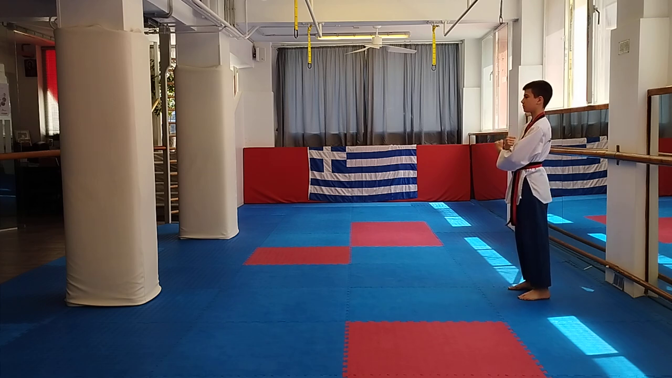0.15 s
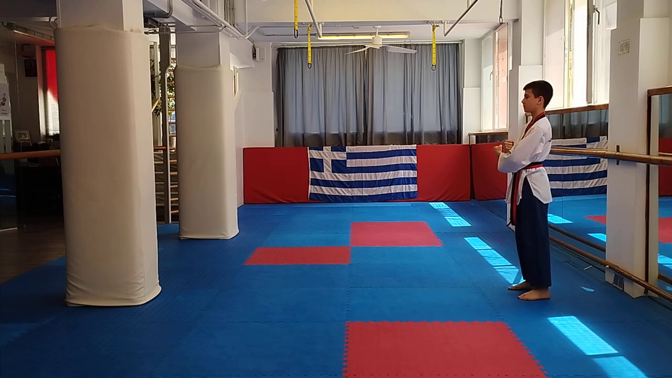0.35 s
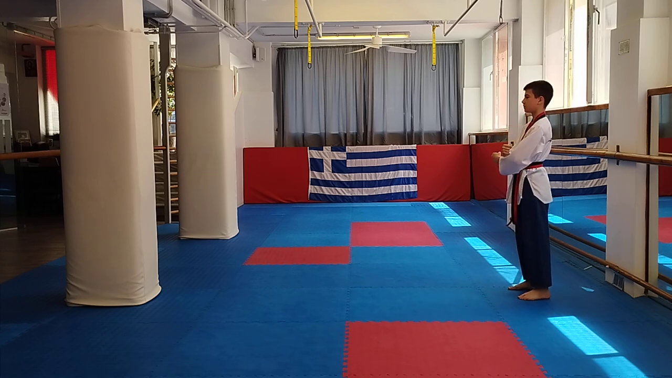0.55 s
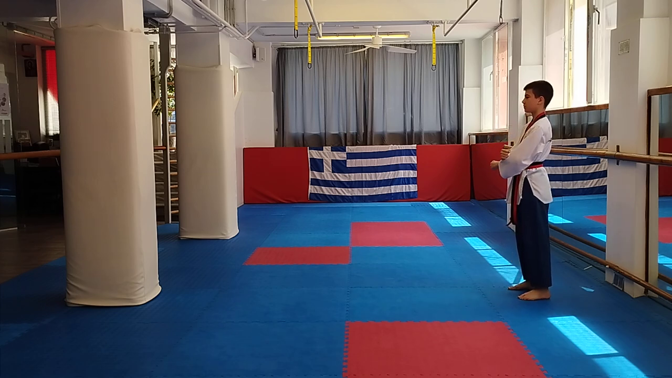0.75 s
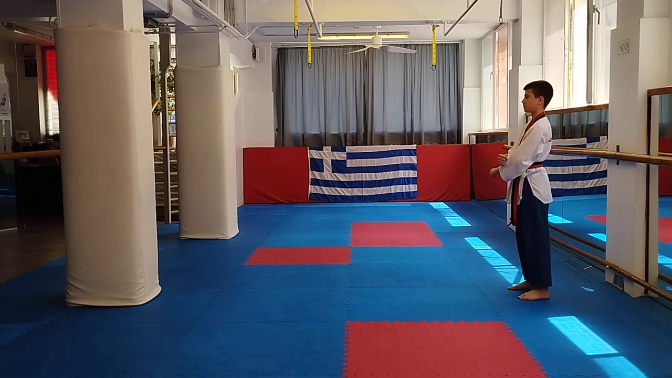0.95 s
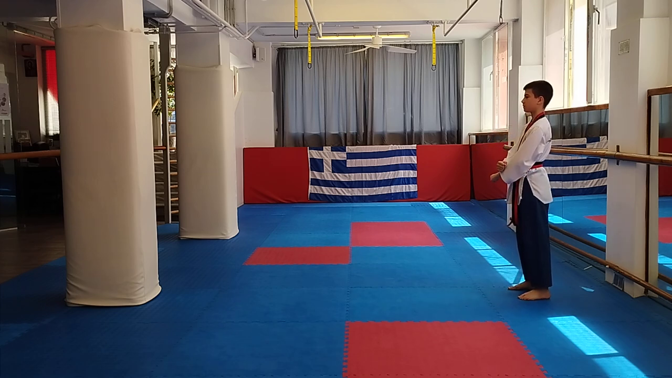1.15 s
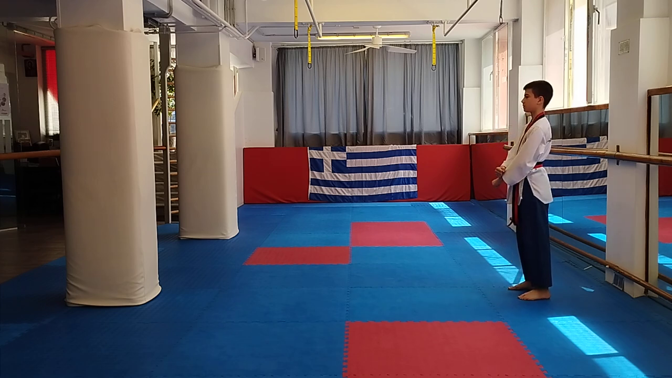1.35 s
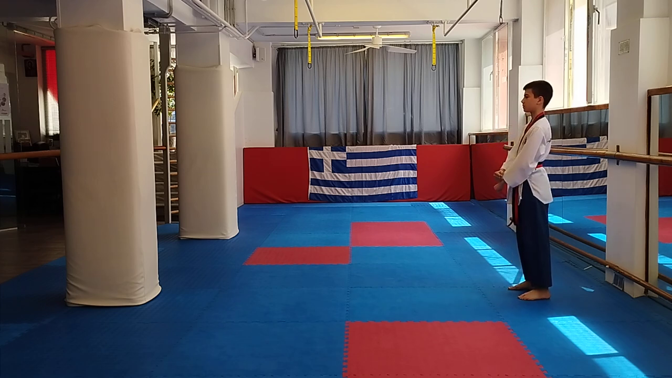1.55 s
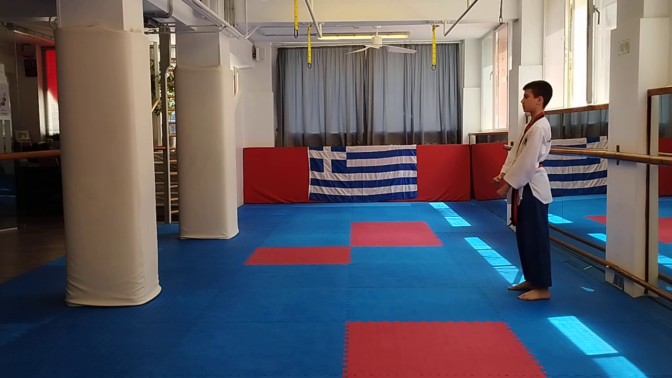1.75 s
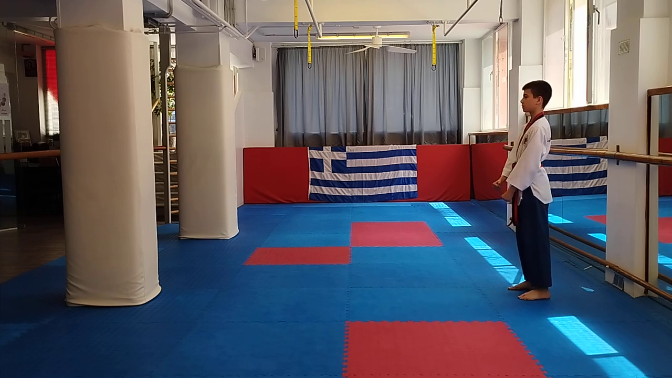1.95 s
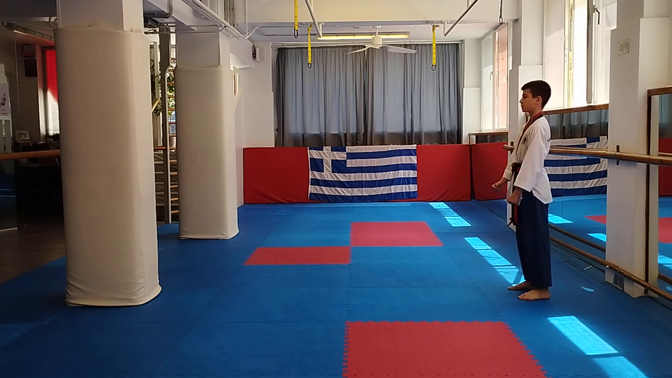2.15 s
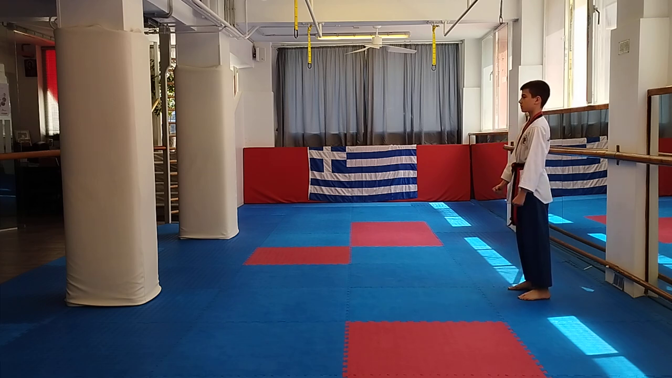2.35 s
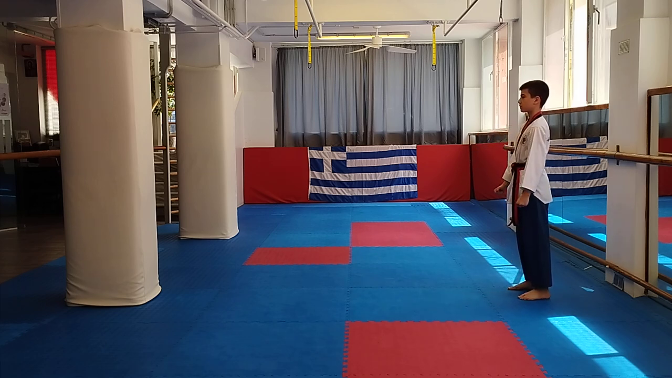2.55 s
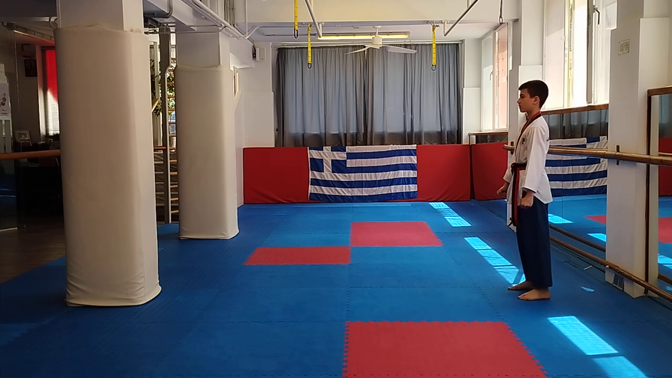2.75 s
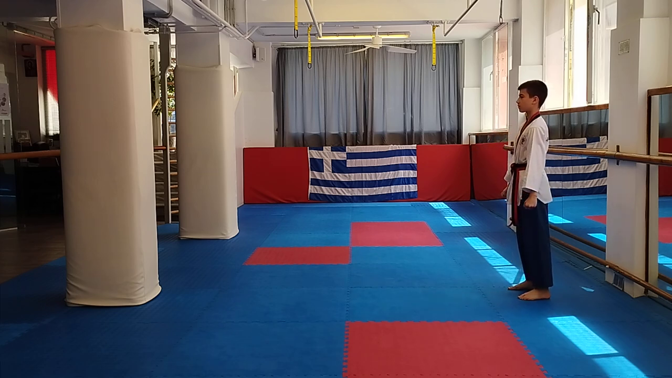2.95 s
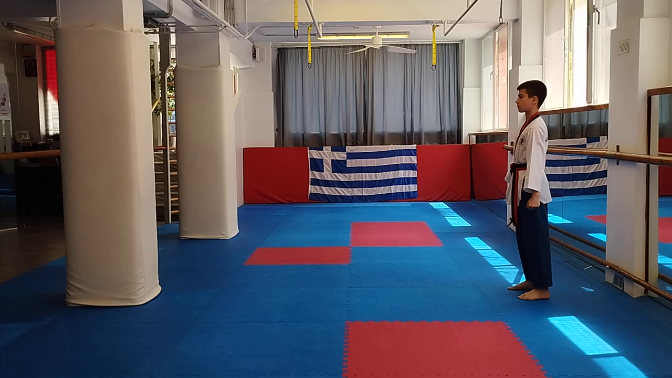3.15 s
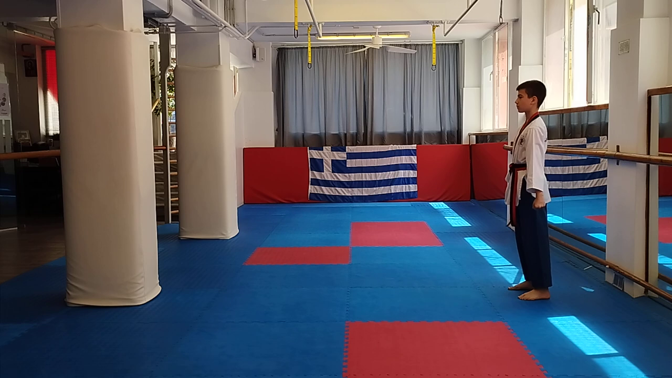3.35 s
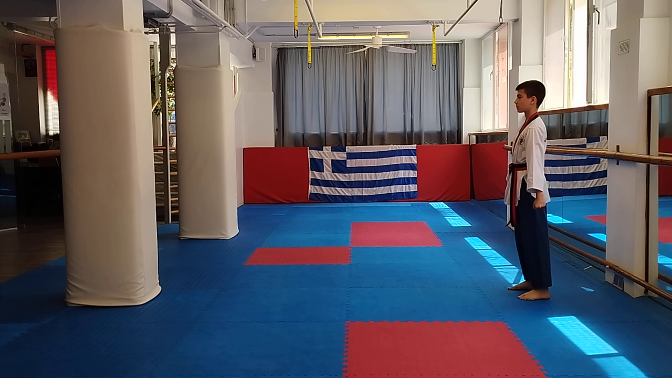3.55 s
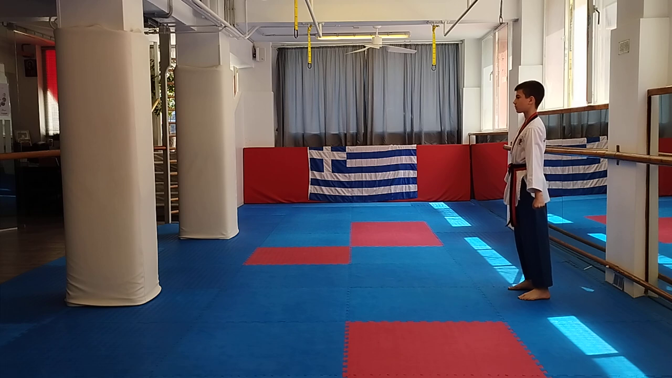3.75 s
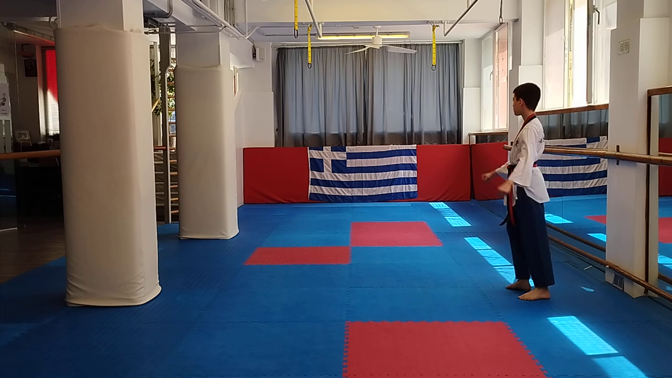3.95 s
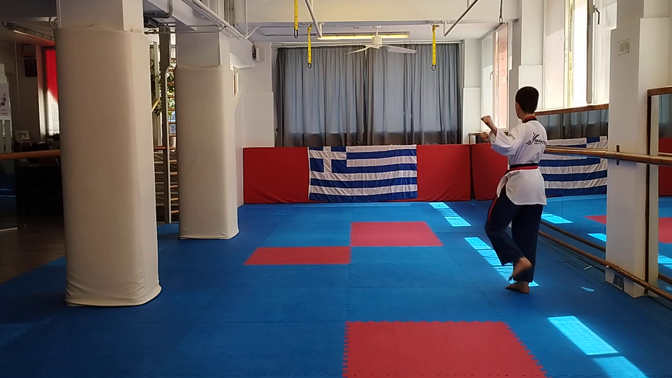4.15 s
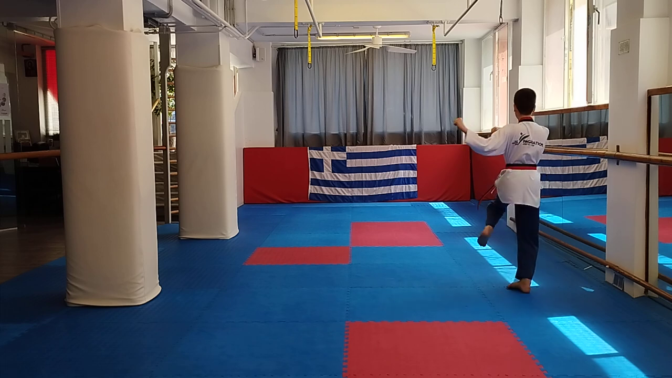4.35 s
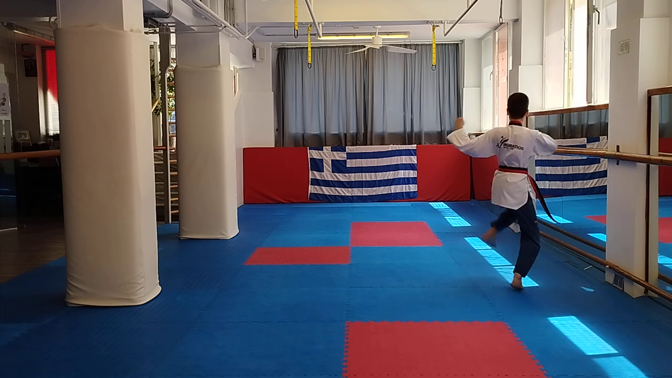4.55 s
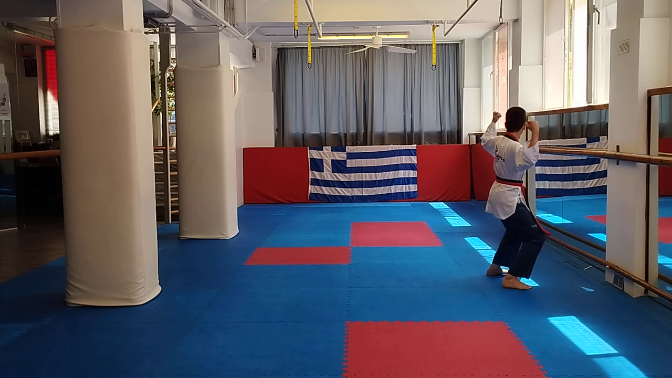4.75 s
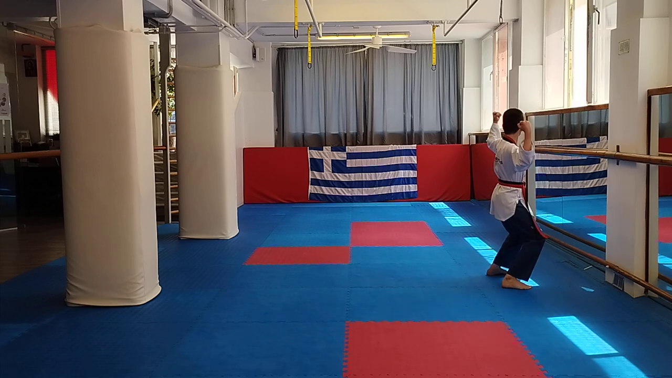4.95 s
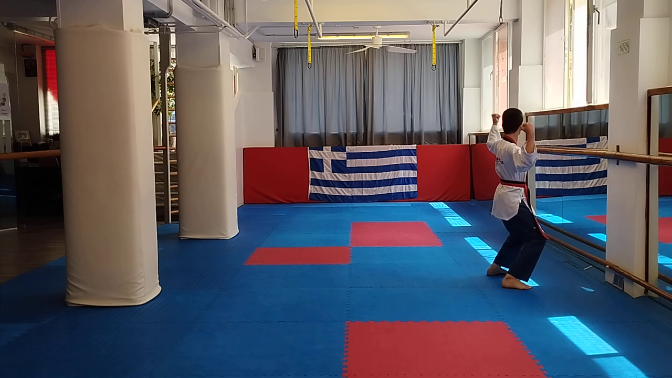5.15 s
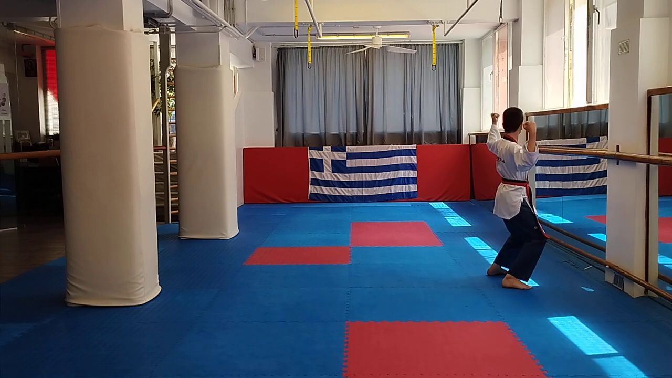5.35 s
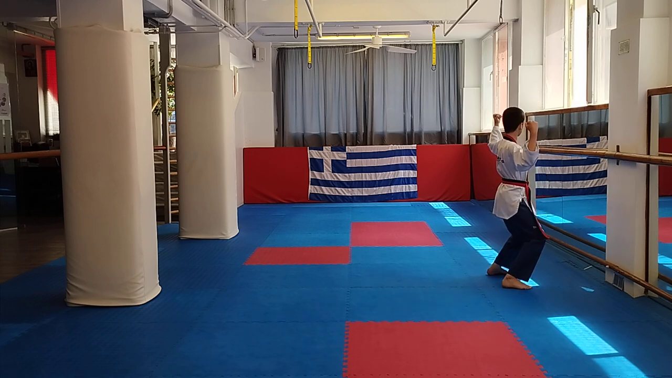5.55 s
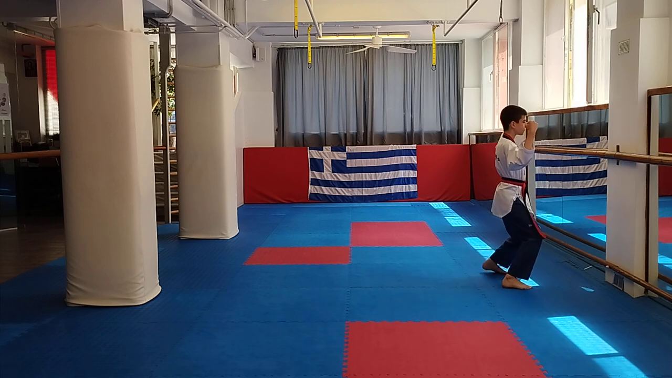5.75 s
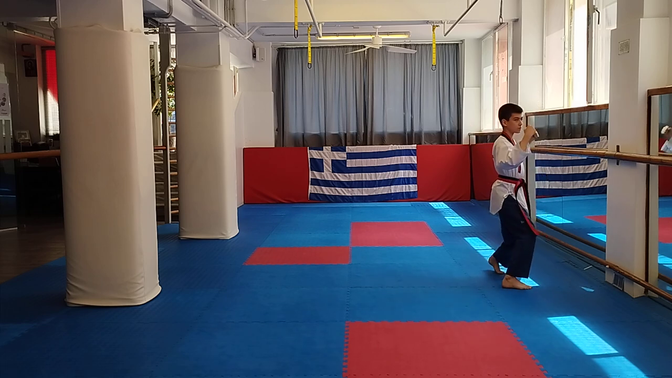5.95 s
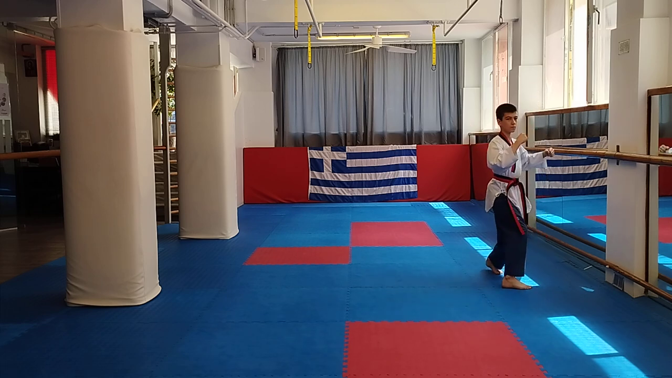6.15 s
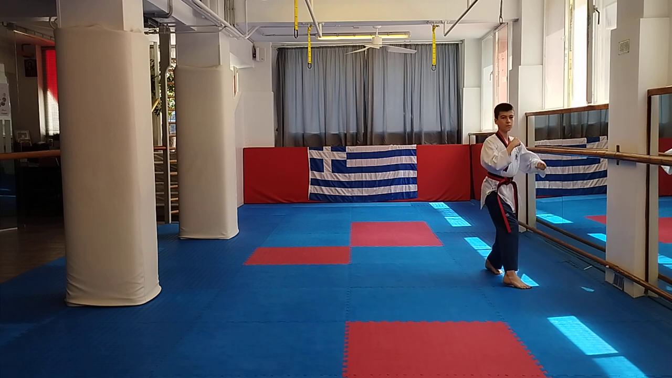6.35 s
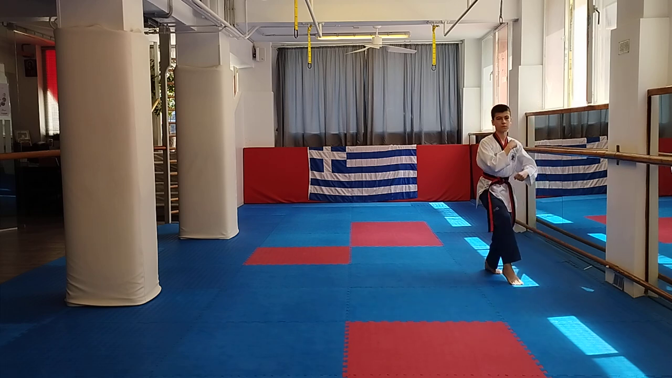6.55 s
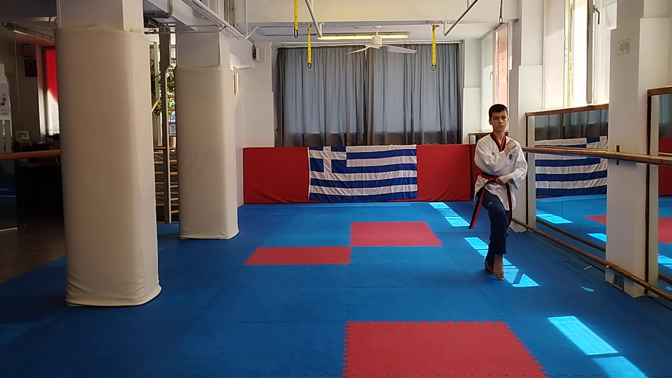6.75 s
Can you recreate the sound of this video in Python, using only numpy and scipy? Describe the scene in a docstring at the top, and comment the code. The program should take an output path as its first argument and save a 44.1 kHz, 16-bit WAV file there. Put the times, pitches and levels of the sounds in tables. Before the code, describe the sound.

A martial arts athlete stands nearly silent while a muffled car outside revs and approaches over deep rumble, with a thin faint whine and tiny bird chirps at first. The tyre noise peaks, the engine slows, then a bare foot smacks the foam mat: a loud crack and thud with a reverberant hall tail. Light clothing strokes follow as the low drone continues. Distant stereo pickup.

```python
"""A bare foot stamps on a foam mat in a hard-walled hall: noise claps, filtered thuds and cloth snaps, floor modes.
Cotton and soles swish as the athlete turns: short strokes of grainy noise.
Outside, a car revs up (tone and noise), then rolls slowly past: orders of a firing rate sinking to idle,
and bands of tyre noise. Gliding hums, a thin whine and two sine chirps join it.
Town rumble, room air and microphone hiss are steady coloured noise."""
import sys
import numpy as np
from scipy import signal
from scipy.fft import rfft, irfft, next_fast_len
from scipy.io import wavfile
from scipy.ndimage import map_coordinates

SR = 44100
rng = np.random.default_rng(int(sys.argv[2]) if len(sys.argv) > 2 else 0)


def dump(signal):
    """Clip the signal to [-1, 1] and save it as 16-bit WAV at the path in sys.argv[1]."""
    limited = np.clip(np.atleast_2d(signal).T, -1, 1)
    pcm = np.round(limited * 32767).astype(np.int16)
    wavfile.write(sys.argv[1], SR, pcm)


N = 304157

# engine speed as the car rolls past: (time [s], firing rate [Hz])
ENGINE_SPEED = [(2.8, 30.21), (3.0, 29.8), (3.4, 29.18), (3.6, 29.07), (3.8, 28.23), (3.95, 27.7),
                (4.1, 26.84), (4.3, 25.72), (4.52, 24.45), (5.0, 23.51), (5.45, 23.87), (5.75, 24.09),
                (6.35, 24.2), (6.9, 24.28)]
# low rumble spectrum: (frequency [Hz], relative level [dB per Hz])
RUMBLE_SPECTRUM = [(12, -22), (28, 3), (43, 0), (60, -9.5), (82, -1.5), (96, -6), (116, 2), (162, 0),
                   (190, -11.5), (218, -6), (270, -17.5), (400, -23.5), (800, -84)]


def amp(db):
    """Decibels to gain."""
    return 10 ** (np.asarray(db) / 20)


def unit(x):
    """Scale to rms 1."""
    return x / np.sqrt(np.mean(x ** 2) + 1e-20)


def along(points, hz):
    """(Hz, value) points interpolated on a log frequency axis."""
    f, v = np.transpose(points)
    return np.interp(np.log(hz + 1), np.log(f + 1), v)


def clock():
    """Time of every sample [s]."""
    return np.arange(N) / SR


def curves(rows):
    """One value per sample for each column after the time."""
    s, *cols = np.transpose(rows)
    return [np.interp(clock(), s, c) for c in cols]


def ramp(start_s, length_s):
    """Linear rise from 0 to 1 over length_s."""
    return np.clip((clock() - start_s) / length_s, 0, 1)


def wobble(rate_hz):
    """Smooth random curve with rate_hz knots a second."""
    knots = rng.standard_normal(int(N * rate_hz / SR) + 4)
    return map_coordinates(knots, [clock() * rate_hz])


def filtered(x, response):
    """Multiply the spectrum of x by a response of frequency."""
    m = next_fast_len(x.shape[-1] + SR // 2)
    spectrum = rfft(x, m) * response(np.fft.rfftfreq(m, 1 / SR))
    return irfft(spectrum, m)[..., :x.shape[-1]]


def diffuse(size):
    """White stereo noise as a room delivers it: alike in the bass, unrelated in the treble."""
    # (frequency [Hz], left-right correlation [0..1])
    likeness = [(60, 0.74), (140, 1), (290, 0.82), (600, 0.43), (1100, 0), (16000, 0.036)]

    def mid_side(hz):
        angle = np.arccos(np.clip(along(likeness, hz), -1, 1)) / 2
        return np.array([np.cos(angle), np.sin(angle)])

    mid, side = filtered(rng.standard_normal((2, size)), mid_side)
    return np.array([mid + side, mid - side])


def noise(spectrum):
    """Diffuse coloured noise of rms 1."""
    return unit(filtered(diffuse(N), lambda hz: amp(along(spectrum, hz))))


def pulse(spectrum, size=8192):
    """Minimum-phase pulse with this spectrum, energy 1, by folding the cepstrum."""
    cepstrum = irfft(np.log(amp(along(spectrum, np.fft.rfftfreq(size, 1 / SR)))))
    cepstrum[1:size // 2] *= 2
    cepstrum[size // 2 + 1:] = 0
    shape = irfft(np.exp(rfft(cepstrum)))
    return shape / np.linalg.norm(shape)


def convolved(x, response):
    """x through an impulse response, cut to the scene's length."""
    return signal.fftconvolve(np.atleast_2d(x), np.atleast_2d(response), axes=1)[:, :N]


def hall(tail_db, walls, hold_s, build_s, grain_db, size=65536):
    """Direct sound, wall echoes and an uneven tail that builds, holds, then dies band by band."""
    # (frequency [Hz], t60 [s])
    decay = [(60, 1.75), (130, 1.03), (250, 0.87), (500, 0.9), (700, 0.44), (1400, 1.4), (3500, 0.94),
             (6000, 0.89), (11000, 0.64), (16000, 0.43)]
    hz, t, bands = signal.stft(diffuse(size), SR, nperseg=256)
    fade = amp(-60 * np.maximum(t - hold_s, 0) / along(decay, hz)[:, None])
    tail = signal.istft(bands * fade, SR, nperseg=256)[1]
    tail = tail * (1 - np.exp(-np.arange(size) / SR / build_s))
    tail = tail * amp(grain_db * wobble(400)[:size])
    response = amp(tail_db) * tail / np.linalg.norm(tail[0])
    response[:, 0] += 1
    for delay_s, db in walls:
        arrival_s = np.abs(delay_s + rng.normal(0, 0.00015, 2))  # left and right differ slightly
        response[[0, 1], (arrival_s * SR).astype(int)] += amp(db)
    return response


def stamp():
    """The sole claps on the mat, the weight thuds and rings the floor; the taut uniform cracks."""
    # contacts: (time [s], relative thud [dB], relative clap [dB], relative cloth snap [dB])
    contacts = [(4.711, -15, -5, -22), (4.7142, -20.5, -9, -18), (4.7179, -0.5, -9, -4.5),
                (4.7202, -6, -11.5, -5.5), (4.779, -3, -11, -18.5)]
    # wall echoes re direct sound: (delay [s], thud level [dB], snap level [dB])
    echoes = [(.009, -5.5, -6), (.022, -14, -0.5), (.031, -13.5, -9), (.05, -24, -7), (.062, -15.5, -18.5),
              (0.1, -30, -6.5)]
    # modes of mat and floor: (frequency [Hz], relative level [dB], t60 [s], rise time constant [s])
    floor_modes = [(45, -22, 0.17, 0.0041), (78.7, -33, 1.19, 0.027), (115.5, -12.5, 0.12, 0.0076),
                   (157, -12, 0.38, 0.045), (203.2, -1, 0.26, 0.063), (265.8, -21, 0.45, 0.0068),
                   (350.6, -31.5, 0.96, 0.0073), (453, -32, 0.32, 0.015), (490, -23.5, 0.61, 0.021),
                   (527, -19.5, 0.37, 0.017), (618, -29, 0.46, .008), (692, -30.5, 0.5, 0.014),
                   (793, -23, 0.11, 0.0014), (1000, -43, 0.76, 0.017)]
    # weight on the mat: (frequency [Hz], relative level [dB per Hz])
    thud_spectrum = [(18, -17), (35, -8.5), (62, -6.5), (90, -5.5), (120, -1.5), (205, -2), (285, -2.5),
                     (340, -7.5), (440, -2), (535, -4), (620, -8), (740, -14), (830, -14), (1020, -19.5),
                     (1400, -53)]
    # sole on the mat: (frequency [Hz], relative level [dB per Hz])
    clap_spectrum = [(200, -20), (500, 0), (700, 8.5), (1000, -1.5), (1300, -12), (2200, -36)]
    # direct crack of taut cloth at each contact, without hall: (frequency [Hz], relative level [dB per Hz])
    crack_spectrum = [(1500, -25), (2600, 2), (3500, -2), (4500, 13), (5400, -15), (6500, 4), (8000, -26),
                      (13000, -17), (16000, -23)]
    # cloth snap sent into the hall: (frequency [Hz], relative level [dB per Hz])
    snap_spectrum = [(500, -33), (1100, 9.5), (1400, 3), (2200, 4.5), (3100, -0.5), (4600, 0), (6800, -7.5),
                     (8200, -20), (11000, -15), (12500, -11.5), (14500, -16), (16000, -23.5)]
    clap_t60_s, crack_t60_s = 0.071, 0.016

    blows, claps, cracks, snaps = np.zeros(N), np.zeros(N), np.zeros(N), np.zeros((2, N))
    delays_s, low_db, high_db = np.transpose(echoes)
    for s, thud_db, clap_db, snap_db in contacts:
        age, start = clock() - s, round(s * SR)
        blows[start] = amp(thud_db)
        claps += amp(clap_db - 60 * np.abs(age) / clap_t60_s) * (age >= 0)
        cracks += amp(snap_db - 60 * np.abs(age) / crack_t60_s) * (age >= 0)
        # a fresh random hall tail for each snap keeps the noise smooth
        answer = hall(tail_db=10.5, walls=zip(delays_s, high_db),
                      hold_s=0.012, build_s=0.00074, grain_db=0.3)[:, :N - start]
        snaps[:, start:start + answer.shape[1]] += amp(snap_db) * answer

    thud_hall = hall(tail_db=12.5, walls=zip(delays_s, low_db),
                     hold_s=0.0094, build_s=0.0029, grain_db=0.6)
    thud = convolved(convolved(blows, pulse(thud_spectrum)), thud_hall)
    clap = claps * noise(clap_spectrum)
    crack = cracks * noise(crack_spectrum)
    snap = convolved(snaps, pulse(snap_spectrum))

    age = np.maximum(clock() - contacts[1][0], 0)  # the floor rings from the second contact
    ring = np.zeros(N)
    for hz, db, t60_s, rise_s in floor_modes:
        envelope = amp(db - 60 * age / t60_s) * (1 - np.exp(-age / rise_s))
        ring += envelope * np.sin(2 * np.pi * hz * age)
    direct = amp(-21.0) * clap + amp(-23.5) * crack
    return direct + amp(4.0) * thud + amp(-5.0) * snap + amp(2.0) * ring


def swishes():
    """Cotton and bare soles rub in short, grainy strokes of noise."""
    # Gaussian strokes: (peak time [s], level [dB], rise sigma [s], fall sigma [s])
    strokes = [(.305, -70.5, 0.0057, 0.023), (3.92, -69, 0.06, 0.044), (4.16, -60, 0.04, 0.044),
               (4.64, -61, 0.037, 0.072), (5.95, -65.5, 0.048, 0.088), (6.305, -59.5, 0.011, 0.026),
               (6.6, -55, 0.05, 0.21)]
    # cloth friction: (frequency [Hz], relative level [dB per Hz])
    fabric = [(1500, 6), (4000, 7.5), (6500, 1.5), (8200, -8.5), (10000, -3.5), (13000, 2), (16000, -1.5)]
    envelope = np.zeros(N)
    for s, db, rise_s, fall_s in strokes:
        age = clock() - s
        sigma_s = np.where(age < 0, rise_s, fall_s)
        envelope += amp(db) * np.exp(-.5 * (age / sigma_s) ** 2)
    return envelope * amp(0.58 * wobble(120)) * noise(fabric)


def closeness():
    """How near the car is: its tyre-hiss curve in dB re the level at the windows."""
    # (time [s], level [dB])
    passing = [(0.0, -78.5), (0.87, -79.5), (1.7, -70.5), (2.2, -71.5), (2.42, -64.5), (2.87, -59.5),
               (3.58, -56), (3.85, -54.5), (4.25, -59.5), (5.4, -60.5), (6.278, -63), (6.897, -66)]
    window_db = -56.5
    level_db, = curves(passing)
    return level_db - window_db


def standing_wave(hz, centre_hz, half_width_hz):
    """Resonance gain of a standing wave of the hall for a tone at hz."""
    return 1 / (1 + ((hz - centre_hz) / half_width_hz) ** 2)


def engine(count=27):
    """Firing-rate orders boom as they cross hall resonances, drone at the exhaust, and rasp when near."""
    # booming in the hall: (time [s], level [dB])
    boom_levels = [(2.6, -68), (2.85, -41), (3.15, -45.5), (3.4, -40), (3.8, -39.5), (4.1, -46.5),
                   (4.3, -41.5), (4.52, -36), (4.9, -32.5), (5.15, -51), (5.4, -40.5), (5.7, -35.5),
                   (6.08, -47), (6.35, -44), (6.7, -37.5)]
    # standing waves that the exhaust excites: (centre [Hz], half-width [Hz], relative level [dB])
    boom_modes = [(51.3, 2.5, -14), (70.6, 2.6, -18), (84.5, 1.6, -3.5), (118.2, 4.1, 2.5)]
    # drone along the street: (time [s], level [dB], focus centre [Hz], focus width before widening [Hz])
    drone_path = [(2.6, -42.5, 210, 68), (2.92, -37.5, 172, 42), (3.15, -36, 193, 58),
                  (3.4, -43.5, 159.9, 53), (3.7, -40, 204, 14), (3.85, -40, 173, 23.8),
                  (4.02, -39.5, 163, 10.3), (4.12, -37.5, 161, 59), (4.24, -34.5, 184, 11),
                  (4.34, -33, 155.5, 10.6), (4.45, -38.5, 155, 25.3), (4.58, -33.5, 171, 16),
                  (4.9, -37.5, 173, 34), (5.17, -30, 169.5, 25), (5.36, -32.5, 173.6, 25),
                  (5.6, -36, 159, 19), (5.76, -35, 178, 36.6), (6.0, -41, 165, 48), (6.3, -40, 197, 15.5),
                  (6.8, -42, 186, 13)]
    # low orders at the exhaust: (frequency [Hz], relative level [dB])
    exhaust_spectrum = [(115, -9), (144, -1), (168, -1), (182, 1.5), (210, -2.5), (238, -1.5), (270, -8.5),
                        (320, -37)]
    # high orders: (frequency [Hz], relative level [dB])
    rasp_spectrum = [(220, -30), (270, -9.5), (298, -11.5), (330, 0.5), (365, 4.5), (415, -2), (455, 4),
                     (490, -6), (530, 3.5), (570, -2), (610, -16), (670, -26), (750, -10), (800, -27)]
    arrive_s, arrive_rise_s = 2.473, 0.16
    throb_db, throb_grows = -29, 0.6  # at reference closeness; dB per dB of closeness
    rasp_db, rasp_grows = -48.5, 1.57  # likewise
    focus_widening = 1.26
    drone_jitter_rad, drone_drift_db = 0.42, 3.5
    rasp_jitter_rad, rasp_drift_db = 0.7, 3

    firing_hz, = curves(ENGINE_SPEED)
    drone_db, centre_hz, width_hz = curves(drone_path)
    boom_db, = curves(boom_levels)
    phase = 2 * np.pi * np.cumsum(firing_hz * (1 + 0.001 * wobble(12))) / SR
    boom, drone, rasp = np.zeros(N), np.zeros((2, N)), np.zeros((2, N))
    boom_power, drone_power = np.zeros(N), np.zeros(N)
    for k in range(2, count):
        hz = k * firing_hz
        # low orders stay in step; the hall scatters the high ones
        turn = k * phase + .15 * k * rng.normal() + drone_jitter_rad * wobble(9)
        # high orders differ between the microphones
        apart = np.array([[1], [-1]]) * rng.normal() * (hz / 700) ** 1.18
        drift = wobble(3.3) + .5 * wobble(11)
        rasp_share = amp(along(rasp_spectrum, hz) + rasp_drift_db * drift)
        rasp += rasp_share * np.sin(turn + apart + rasp_jitter_rad * wobble(12))
        if hz.min() < 260:
            resonance = sum(amp(db) * standing_wave(hz, centre, half_width)
                            for centre, half_width, db in boom_modes)
            boom += resonance * np.cos(turn)
            boom_power += resonance ** 2
            # the strongest part of the drone shifts with the car's place in the street
            focus = standing_wave(hz, centre_hz, focus_widening * width_hz)
            share = amp(along(exhaust_spectrum, hz) + drone_drift_db * drift) * focus
            drone += share * np.sin(turn + apart)
            drone_power += share ** 2

    near_db = closeness()
    # the firing rate itself meets the hall's lowest standing wave
    throb = amp(throb_db + throb_grows * near_db) * standing_wave(firing_hz, 29, 1.8)
    throb = throb * unit(np.sin(phase))
    # dividing by the summed power leaves the level curves in charge
    boom = amp(boom_db) * unit(boom / np.sqrt(boom_power))
    drone = amp(drone_db) * unit(drone / np.sqrt(drone_power))
    rasp = amp(rasp_db + rasp_grows * near_db) * unit(rasp)
    return ramp(arrive_s, arrive_rise_s) * (throb + boom + drone + rasp)


def approaching_car():
    """The car, still far off, revs up from idle; throb, drone and rumble end, and the roar lingers."""
    # (frequency [Hz], relative level [dB per Hz])
    drone_spectrum = [(60, -28), (82, -1), (100, -27), (124, 4.5), (142, -7.5), (160, 6.5), (192, -12.5),
                      (211, -1.5), (224, -25), (270, -18), (385, -21), (412, -7), (440, -29), (550, -75)]
    # (frequency [Hz], relative level [dB per Hz])
    roar_spectrum = [(150, -14), (240, 1), (330, -1), (400, 4.5), (540, 1.5), (650, -15), (900, -19),
                     (1400, -55)]
    start_s, rise_s, end_s, fall_s = .9, 0.17, 2.78, 0.29
    idle_hz, drive_hz, rev_s = 28, 43.7, 0.712
    drone_swell_s, roar_swell_s = 1.79, 1.92
    roar_end_s, roar_fall_s = 3.66, 0.73

    firing_hz = idle_hz + (drive_hz - idle_hz) * ramp(start_s, rev_s)
    phase = 2 * np.pi * np.cumsum(firing_hz * (1 + 0.022 * wobble(3.2))) / SR
    heard = ramp(start_s, rise_s) * (1 - ramp(end_s - fall_s, fall_s))
    rolling = ramp(start_s, roar_swell_s) * (1 - ramp(roar_end_s - roar_fall_s, roar_fall_s))
    throb = amp(-51.5) * unit(np.sin(phase))
    rumble = amp(-44.5) * noise(RUMBLE_SPECTRUM)
    drone = ramp(start_s, drone_swell_s) * amp(-39.5) * noise(drone_spectrum)
    roar = rolling * amp(-50) * noise(roar_spectrum)
    return heard * (throb + rumble + drone) + roar


def hums():
    """Single tones of the traffic catch in the hall briefly, gliding as they swell and fade."""
    # (start [s], rise [s], fall [s], start pitch [Hz], glide [Hz per s], level [dB])
    tones = [(1.12, 0.073, 1.1, 213.5, -6.5, -45.5), (2.32, 0.13, 0.15, 81, 12, -41),
             (4.17, .09, 0.13, 215.6, 26, -40), (5.65, 0.092, 0.12, 213.3, 19, -44)]
    out = np.zeros(N)
    for s, rise_s, fall_s, hz, glide, db in tones:
        pitch_hz = hz + glide * np.clip(clock() - s, 0, rise_s + fall_s) + 1.13 * wobble(8)
        envelope = amp(db) * ramp(s, rise_s) * (1 - ramp(s + rise_s, fall_s))
        out += envelope * np.sin(2 * np.pi * np.cumsum(pitch_hz) / SR)
    return out


def street():
    """Tyre noise swells and brightens as the car passes, over tyres down the street and town rumble."""
    # low tyre band: (frequency [Hz], relative level [dB per Hz])
    roar_spectrum = [(150, -20), (270, 2), (330, 6), (420, 1), (530, -2.5), (650, -6.5), (900, -12),
                     (1400, -57.5)]
    # middle tyre band: (frequency [Hz], relative level [dB per Hz])
    rush_spectrum = [(500, -25), (800, -9), (1120, 4), (1400, 0), (1800, 1.5), (2500, -2), (3100, -10),
                     (4500, -32)]
    # high tyre band: (frequency [Hz], relative level [dB per Hz])
    hiss_spectrum = [(2000, -29), (3100, -0.5), (4300, 1), (5400, -6.5), (6500, -11), (7300, -18),
                     (8200, -47.5), (10000, -27), (13000, -20.5), (16000, -39)]
    # tyres farther down the street: (frequency [Hz], relative level [dB per Hz])
    far_spectrum = [(500, -30), (720, -8), (880, -1), (1100, 4.5), (1480, -16.5), (1900, 2), (2200, -18.5),
                    (2500, 1.5), (2950, -16), (3600, -12), (5000, -46), (8000, -75)]
    # their surges: (time [s], level [dB])
    surges = [(.9, -79), (1.2, -72), (1.5, -73), (1.72, -61.5), (2.0, -63.5), (2.2, -62), (2.5, -63),
              (3.0, -77), (5.7, -69), (5.9, -56), (6.1, -57), (6.3, -60), (6.9, -63)]
    roar_full_db, roar_db_per_hz = -7, 0.1  # closeness where roar stops growing; loss per Hz of slowing

    near_db = closeness()
    firing_hz, = curves(ENGINE_SPEED)
    slowing_hz = firing_hz.max() - firing_hz
    roar_db = -49 + 1.27 * np.minimum(near_db - roar_full_db, 0) - roar_db_per_hz * slowing_hz
    roar = amp(roar_db) * noise(roar_spectrum)
    rush = amp(-49.5 + 0.83 * near_db) * noise(rush_spectrum)
    hiss = amp(-56 + near_db) * noise(hiss_spectrum)
    tyres = amp(0.65 * wobble(6.6)) * (roar + rush + hiss)
    far_db, = curves(surges)
    far_tyres = amp(far_db + 1.1 * wobble(10)) * noise(far_spectrum)
    return tyres + far_tyres + amp(-43.5) * noise(RUMBLE_SPECTRUM)


def whine(hz=1965):
    """Thin, nearly steady tone that drops a little in level, lingers and fades away."""
    drop_db, drop_s, drop_takes_s = 3.5, 0.73, .14
    end_s, fall_s = 2.7, 0.7
    level_db = -72 - drop_db * ramp(drop_s, drop_takes_s)
    level = amp(level_db) * (1 - ramp(end_s - fall_s, fall_s))
    phase = 2 * np.pi * np.cumsum(hz + wobble(25)) / SR
    # level and phase waver separately in each channel
    pair = [amp(wobble(6.2)) * np.sin(phase + 0.7 * wobble(2.4)) for _ in range(2)]
    return level * unit(np.array(pair))


def chirps():
    """A distant bird gives two thin, slightly falling notes with Gaussian envelopes."""
    # (peak time [s], pitch [Hz], level [dB], 1/e half-length [s])
    notes = [(0.215, 5640, -77, .022), (.36, 5500, -80, .045)]
    out = np.zeros(N)
    for s, hz, db, length_s in notes:
        age = (clock() - s) / length_s
        pitch_hz = hz * (1 - 0.0046 * np.clip(age, -3, 3) + .012 * wobble(206))
        out += amp(db) * np.exp(-age ** 2) * np.sin(2 * np.pi * np.cumsum(pitch_hz) / SR)
    return out


def background():
    """Steady air noise of the hall and the microphones' own hiss."""
    # room air: (frequency [Hz], relative level [dB per Hz])
    air = [(150, -16), (270, -3), (400, -3), (520, -8), (640, -5), (760, -17), (910, -10), (1010, -18),
           (1140, -14), (1400, -20), (2400, -29), (3000, -34.5), (6000, -36), (9000, -56.5)]
    # microphone hiss: (frequency [Hz], relative level [dB per Hz])
    self_noise = [(1000, 5.5), (9000, -5.5), (13000, 1.5), (16000, -2.5)]
    return amp(-58.5) * noise(air) + amp(-77.0) * noise(self_noise)


def scene():
    """The athlete in the hall, the street outside and the steady background."""
    athlete = stamp() + swishes()
    outside = engine() + approaching_car() + hums() + street() + whine() + chirps()
    return athlete + outside + background()


def record(dry):
    """Two microphones with a common treble colour, a left-right imbalance and a steep band limit."""
    # treble colour: (frequency [Hz], gain [dB])
    colour = [(9800, 0.5), (11000, -9.5), (12500, -1)]
    # imbalance: (frequency [Hz], left minus right [dB])
    balance = [(100, 0), (700, -0.5), (2400, -0.5), (4400, -2), (8000, -4.5), (10000, 1), (13000, 4)]
    top_hz = 15750
    tilt = np.array([[.5], [-.5]])

    def response(hz):
        gain_db = along(colour, hz) + tilt * along(balance, hz)
        return amp(gain_db) * (hz < top_hz)

    return filtered(dry, response)


dry = scene()
out = record(dry)
dump(out)
```